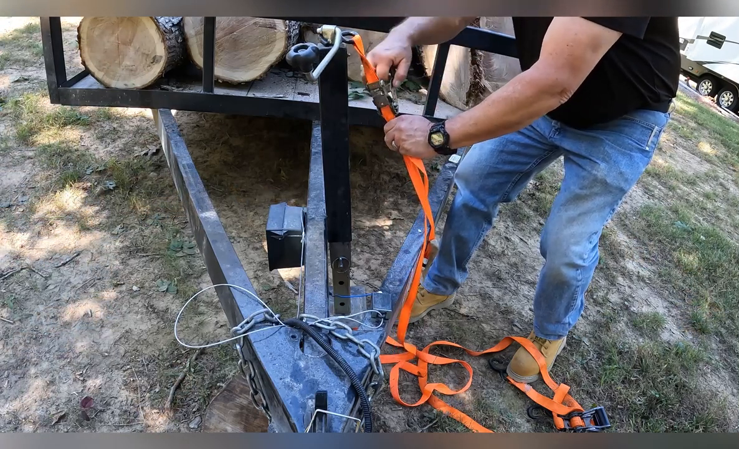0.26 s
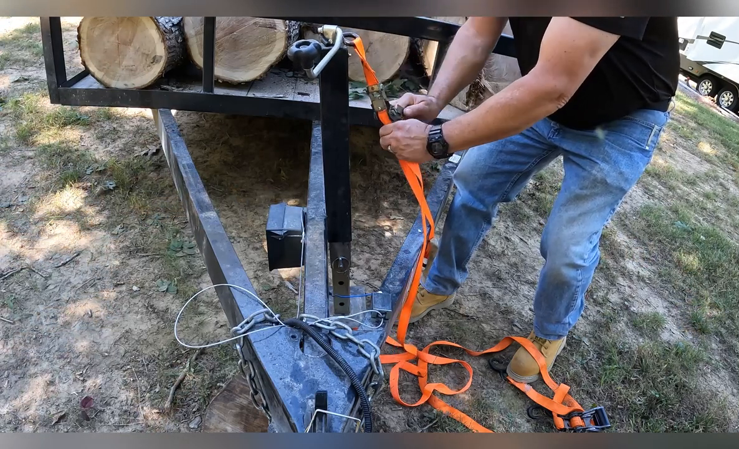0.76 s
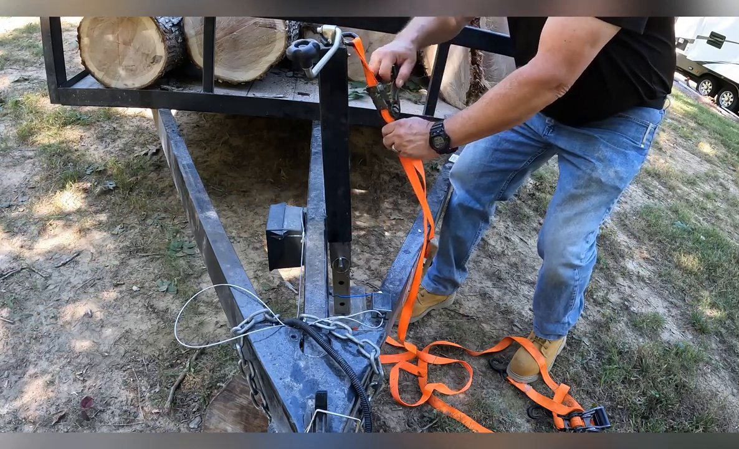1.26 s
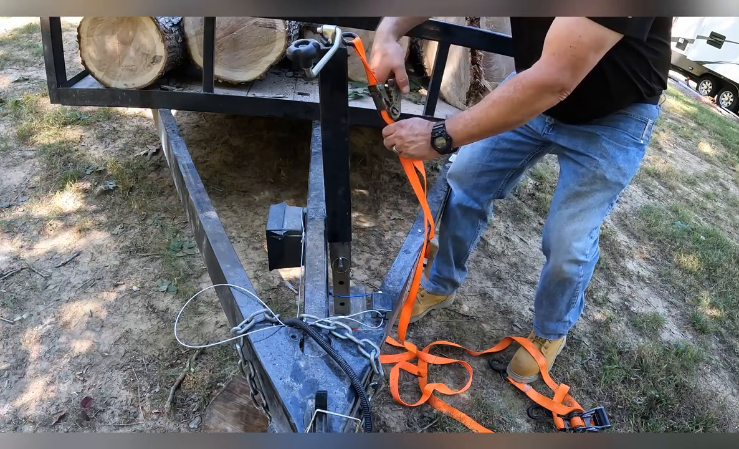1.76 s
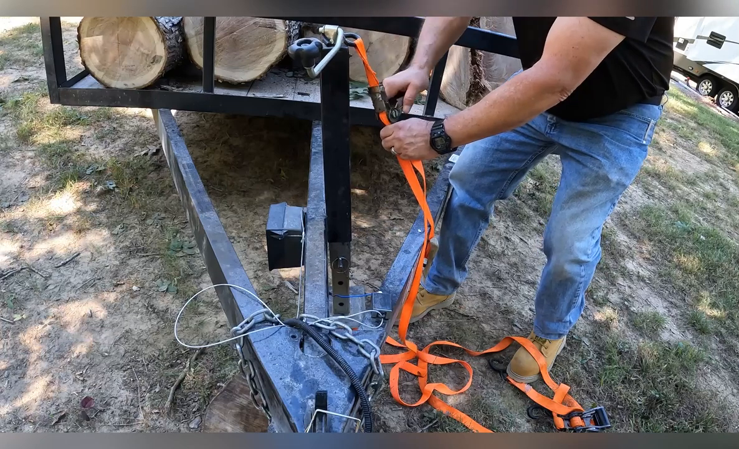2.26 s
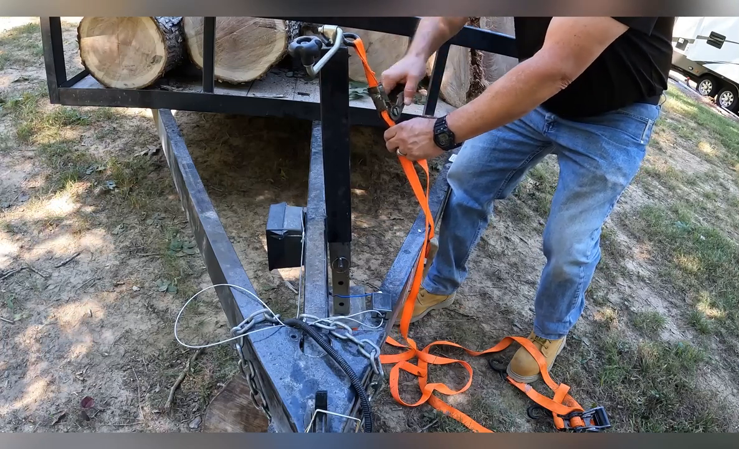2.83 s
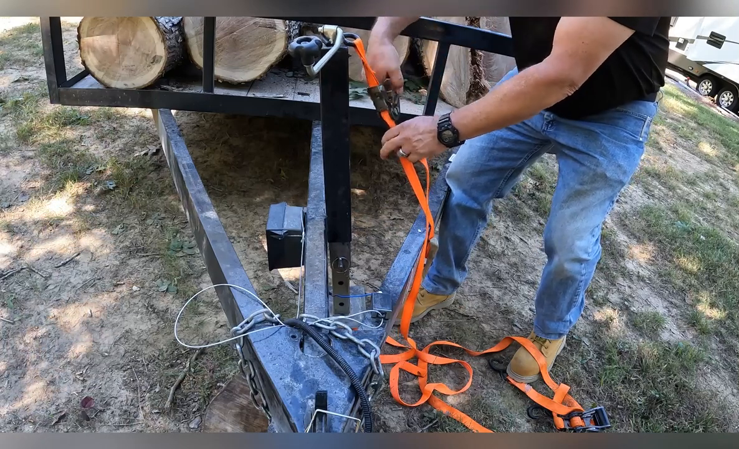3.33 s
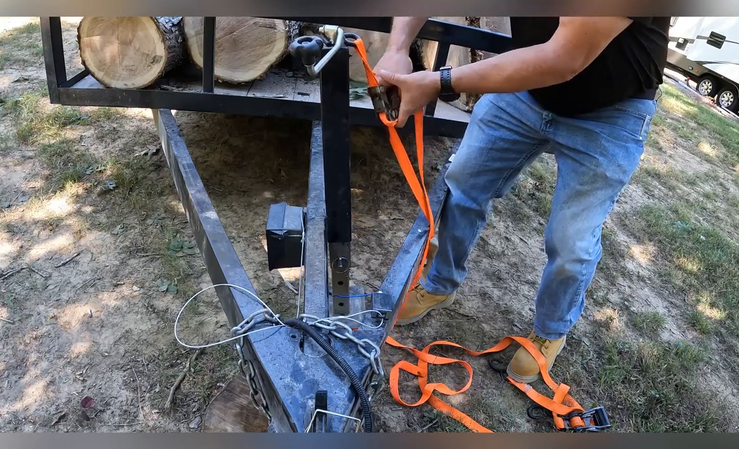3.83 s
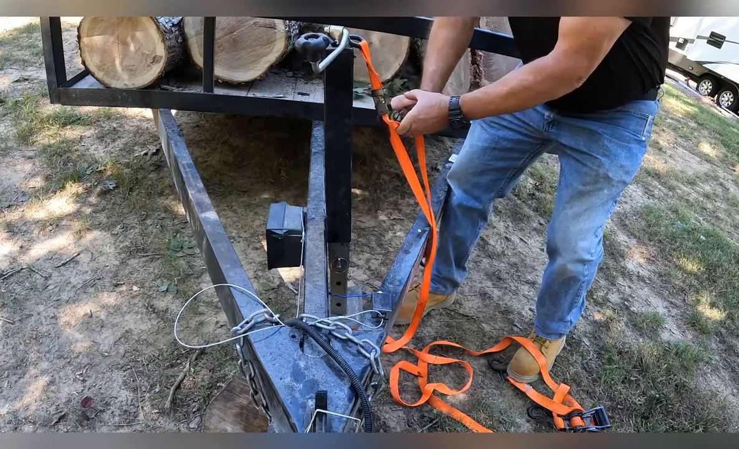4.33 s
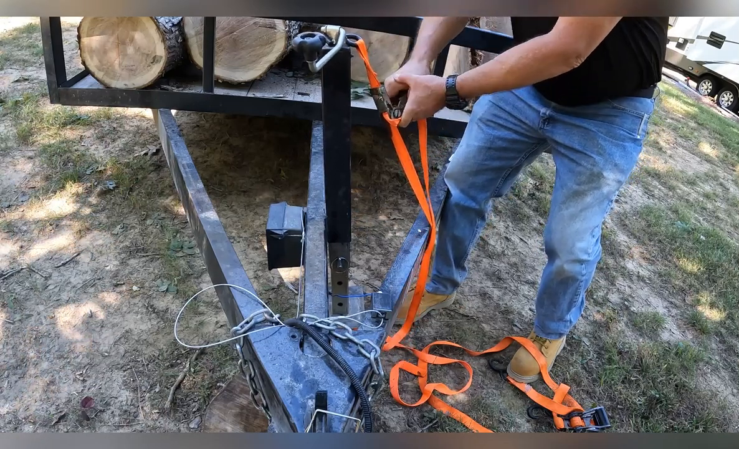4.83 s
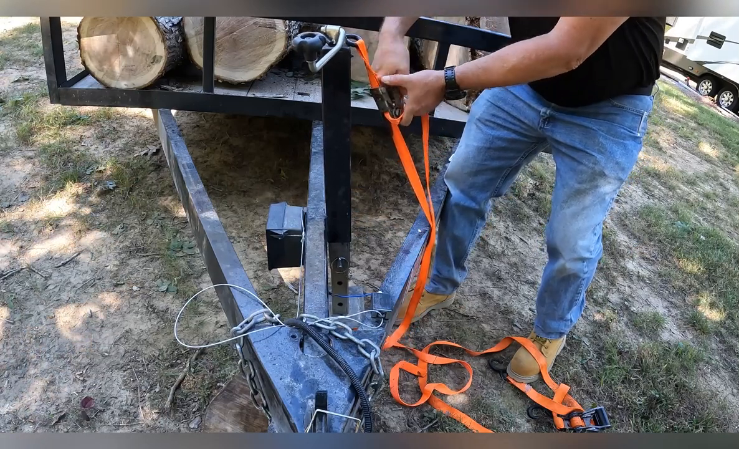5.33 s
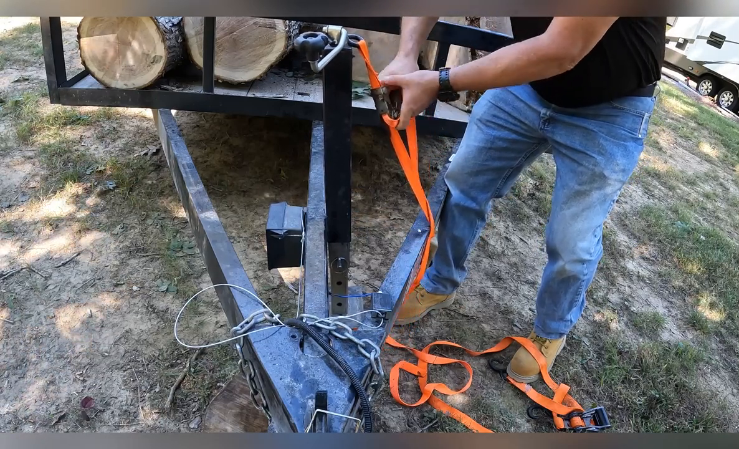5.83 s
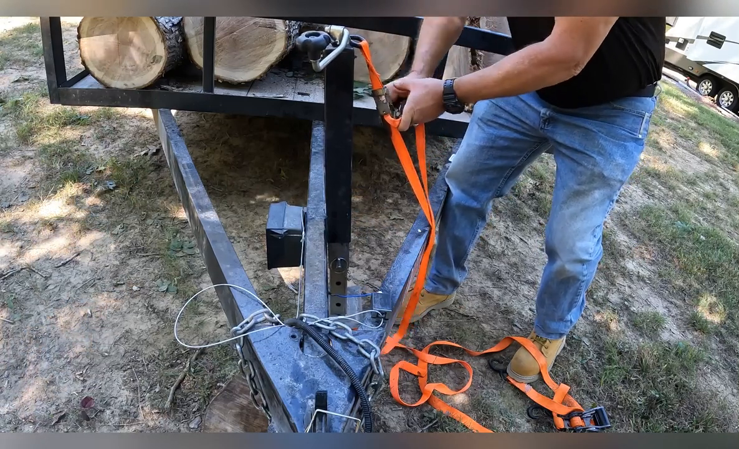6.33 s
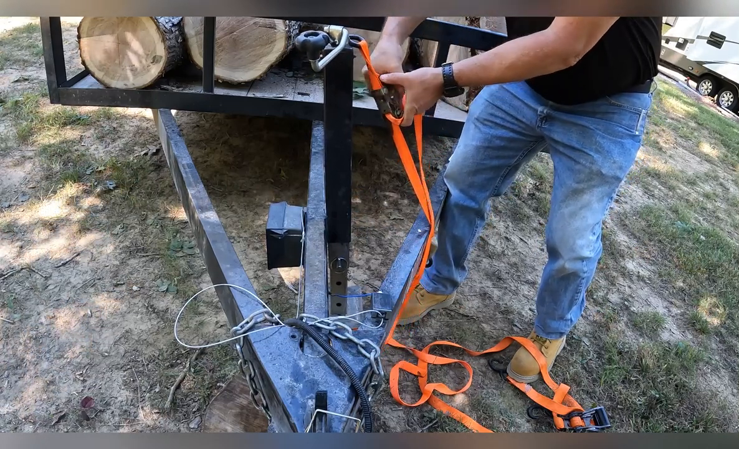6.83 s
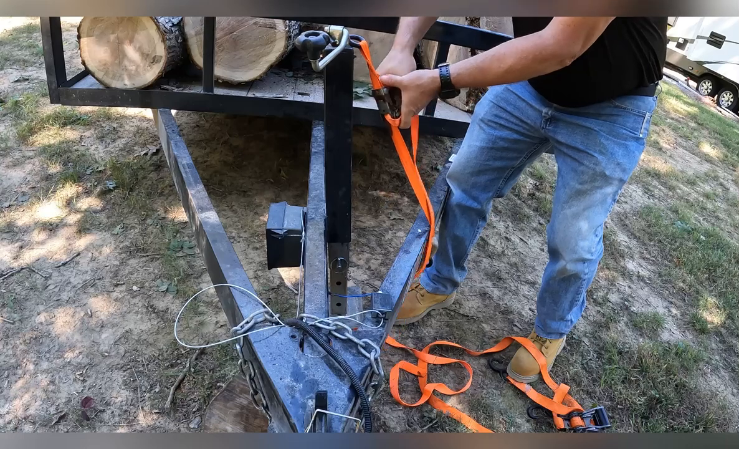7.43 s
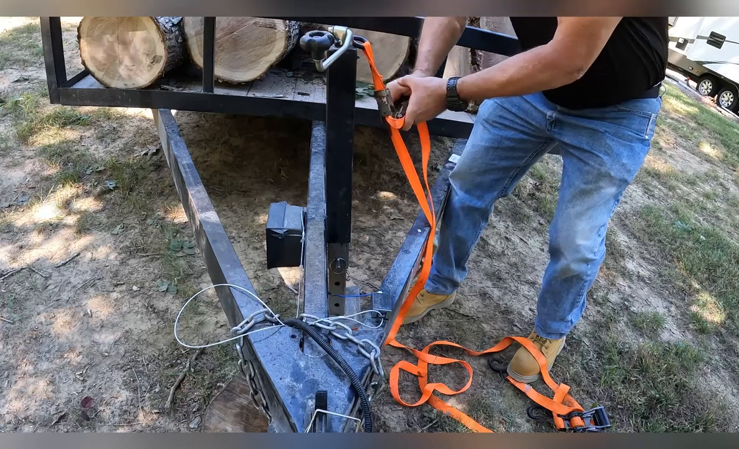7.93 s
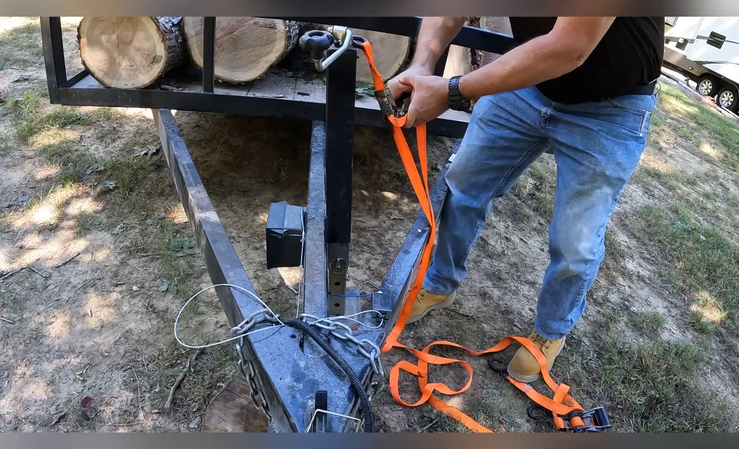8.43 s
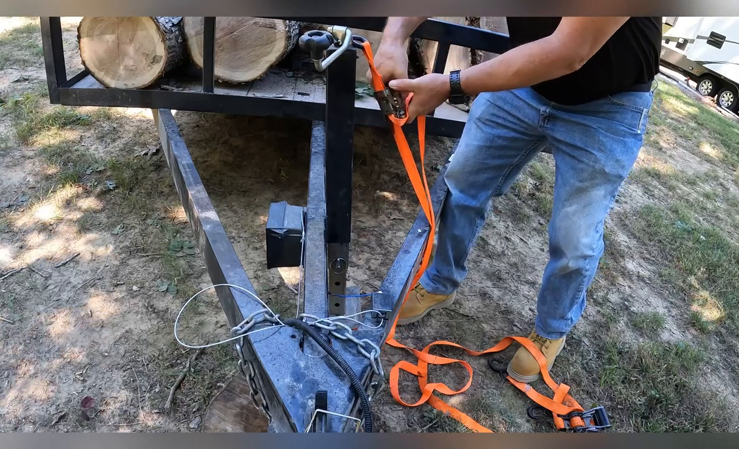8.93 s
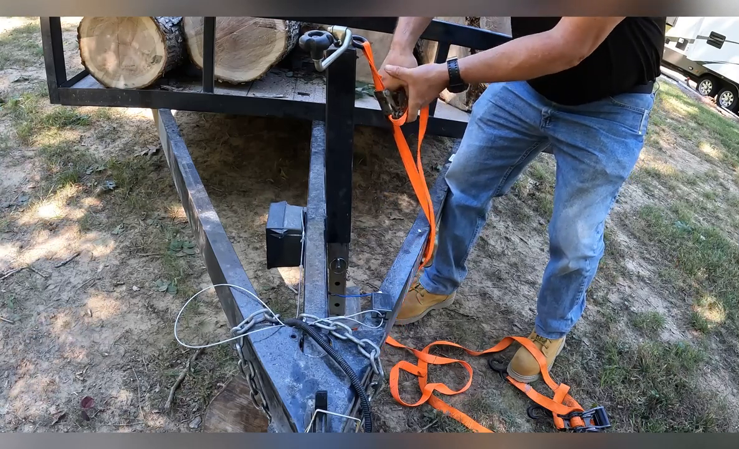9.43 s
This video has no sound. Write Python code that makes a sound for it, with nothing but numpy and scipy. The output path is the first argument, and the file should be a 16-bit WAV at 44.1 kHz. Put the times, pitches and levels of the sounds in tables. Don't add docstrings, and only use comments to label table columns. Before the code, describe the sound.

Sharp metallic pawl clicks crack one or two at a time as a strap tightens, ringing the trailer steel over faint hum and buffeting wind.

```python
import sys
import numpy as np
from scipy import signal
from scipy.fft import rfft, irfft
from scipy.io import wavfile
from scipy.ndimage import uniform_filter1d

SR = 44100
rng = np.random.default_rng(int(sys.argv[2]) if len(sys.argv) > 2 else 0)


def file_out(sig):
    cols = np.atleast_2d(sig).T
    lim = np.clip(cols, -1, 1)
    pcm = np.round(lim * 32767).astype(np.int16)
    wavfile.write(sys.argv[1], SR, pcm)


def volts_from_decibels(level):
    exponent = np.asarray(level, float) / 20
    return 10 ** exponent


N = 426888
HARD_DB = -13


def level(x, db):
    return x * volts_from_decibels(db) / np.sqrt(np.mean(x ** 2, axis=-1, keepdims=True))


def peak_one(x):
    return x / np.sqrt(uniform_filter1d(x ** 2, size=44).max(axis=-1, keepdims=True))


def fade(t, t60):
    return np.exp(-np.log(1000) * t / t60)


def sine(hz, t):
    return np.sin(2 * np.pi * hz * t)


def read(table, hz):
    table = np.array(table)
    return np.interp(np.log(np.maximum(hz, 1)), np.log(table[:, 0]), table[:, 1])


def curves(table):
    s, *columns = np.transpose(table)
    return [np.interp(np.arange(N) / SR, s, c) for c in columns]


def band(x, low_hz, high_hz, order=2):
    sos = signal.butter(order, [low_hz, min(high_hz, .45 * SR)], "band", fs=SR, output="sos")
    return signal.sosfilt(sos, x)


def walk(rate):
    k = int(SR / rate)
    steps = np.repeat(rng.standard_normal(N // k + 1), k)
    return 1.446 * uniform_filter1d(uniform_filter1d(steps, k), k)[:N]


def place(times, sounds):
    out = np.zeros((2, N + 2 * sounds.shape[-1]))
    for s, sound in zip(times, sounds):
        at = max(int(s * SR), 0)
        out[:, at:at + sound.shape[-1]] += sound
    return out[:, :N]


def resonance(hz, centre_hz, width_hz):
    return 1 / (1 + 2j * (hz - centre_hz) / width_hz)


def resonances(modes, hz, count, scatter_db, detune):
    chance = rng.standard_normal((count, len(modes), 2))
    response = 0
    for k, (mode_hz, width_hz, db) in enumerate(modes):
        strength = volts_from_decibels(db + scatter_db * chance[:, k, :1])
        response = response + strength * resonance(hz, mode_hz * (1 + detune * chance[:, k, 1:]), width_hz)
    return response


def contacts():
    # start in seconds, level in dB, t60 in seconds, most excited resonance in Hz, ringing one in Hz.
    snaps = [(0.0841, -10, 0.041, 4100, 3600), (0.1646, -13, 0.031, 5500, 5160),
             (0.4906, -12.5, 0.031, 6570, 6200), (0.4945, -16, 0.025, 11150, 6300),
             (0.7735, -15, 0.009, 5300, 5400), (0.7819, -14, 0.023, 7450, 4040),
             (1.2212, -9.5, 0.027, 3180, 4670), (1.307, -9.5, 0.029, 7700, 6740),
             (2.2379, -12, 0.011, 4800, 4740), (2.2438, -10, 0.027, 3540, 3450),
             (3.1324, -29, 0.011, 4600, 4650), (3.138, -10, 0.029, 3800, 5840),
             (4.102, -14.5, 0.027, 4850, 4700), (4.105, -15.5, 0.023, 7500, 6650),
             (4.11, -19.5, 0.052, 5050, 4850), (4.113, -13.5, 0.031, 2300, 4380),
             (5.1625, -9, 0.03, 7200, 4560), (6.0077, -12, 0.049, 4520, 4700),
             (6.018, -20, 0.01, 4720, 4440), (6.0234, -13.5, .018, 6200, 2250),
             (6.8156, -10.5, 0.022, 2820, 4000), (6.8255, -31, 0.0082, 3750, 6400),
             (8.0034, -19.5, 0.015, 4650, 3130), (8.007, -16, 0.012, 7100, 4670),
             (8.02, -20, 0.015, 4860, 4800), (8.025, -14.5, 0.028, 6800, 6260),
             (8.0281, -14, 0.011, 4630, 2380), (8.0312, -23, 0.025, 6400, 4670),
             (8.8669, -10.5, 0.025, 3570, 4340)]
    # start in seconds, level in dB, treble minus presence in dB, most excited resonance in Hz.
    ticks = [(0.3237, -32.5, -5, 4560), (0.614, -42.5, -19, 2800), (0.697, -44.5, -3, 4800),
             (1.1048, -40, -10, 4620), (2.552, -46, -9, 2000), (2.7223, -28, -12.5, 5430),
             (2.8257, -38.5, -11, 4660), (3.044, -51, 1, 5430), (4.621, -26, -2, 4770),
             (4.681, -34, -7, 4450), (4.999, -35, -16, 2600), (5.022, -41.5, -18, 7800),
             (5.047, -41.5, -27, 3270), (5.625, -43, -12, 3100), (5.808, -45.5, -8, 5500),
             (6.373, -44.5, -14, 5970), (6.396, -39.5, -11, 4440), (6.6876, -40, -18, 3770),
             (6.993, -33, 1, 3000), (7.374, -33, -17, 1120), (7.4591, -36.5, -20, 2550),
             (7.546, -50, -13, 2390), (7.569, -46, -4, 2890), (7.922, -52, -2, 3000),
             (7.9342, -30, -10, 4730), (8.313, -36, 1, 6850), (8.3165, -31, -13, 4670),
             (8.389, -29.5, -17, 3340), (9.0036, -41, -12, 3820), (9.0255, -33.5, 0, 3800),
             (9.028, -30.5, 1, 3900), (2.753, -51, -2, 6500), (2.788, -61, 8, 9800), (2.7948, -53, 3, 4700),
             (2.9185, -53, -15, 3900), (2.944, -57, 12, 10500), (2.987, -51, 2, 4800),
             (4.626, -33, -12, 2320), (4.81, -44, -12, 4400), (6.332, -49, -8, 2800),
             (9.01, -43, -15, 2480)]
    # start in seconds, level in dB, treble minus presence in dB, most excited resonance in Hz.
    skips = [(0.081, -26.5, -2, 3620), (0.162, -38, -24, 3000), (.281, -38.5, -11, 4370),
             (0.284, -45, -8, 5750), (0.29, -37.5, -8, 4160), (1.2127, -36, -6.5, 2200),
             (1.393, -40, -5, 4680), (1.401, -37, -7, 4650), (1.425, -35.5, -9, 5400),
             (2.9552, -39.5, -17, 3120), (2.956, -55, -19, 2920), (3.197, -35.5, -17, 2930),
             (3.209, -42.5, -9, 3210), (4.356, -42, -11, 4830), (4.357, -41.5, -20, 5400),
             (4.803, -47, -5, 4340), (5.156, -35.5, -17, 4500), (5.3272, -33, -14, 3770),
             (5.331, -42, -13, 4820), (5.338, -34.5, -21, 3020), (6.808, -33, -13, 6870),
             (6.955, -43.5, -12, 2300), (6.961, -46.5, -3, 3980), (6.967, -43, -8, 3500),
             (6.975, -44, -10, 6800), (6.9848, -39, -18, 3230), (6.989, -57, -15, 3700),
             (7.0047, -37, -12, 5800), (7.0073, -38, -21, 3090), (8.2983, -51, -12, 1980),
             (8.3998, -27.5, -23, 2300), (6.204, -54, -27, 5250), (6.211, -40, -43, 3500),
             (8.196, -45, -18, 3240), (8.2, -38, -30, 3000), (8.393, -38, -13, 5500),
             (8.408, -34, -14, 3000)]
    # start in seconds, level in dB.
    climbs = [
        (0.053, -35),
        (0.4698, -37.5),
        (2.2144, -44),
        (4.072, -43.5),
        (5.133, -41.5),
        (5.973, -37),
        (6.7757, -45),
    ]
    # start in seconds, level in dB.
    bumps = [(0.7975, -35), (2.2523, -37), (2.279, -46), (3.148, -38), (6.827, -34), (8.876, -36),
             (8.418, -37), (5.1873, -39), (5.766, -44.5), (6.1995, -33.5), (6.653, -52), (7.006, -42),
             (8.0573, -53), (8.1874, -29), (8.208, -45), (8.355, -45), (8.4023, -33)]
    rows = []
    for s, db, t60, hz, ring_hz in snaps:
        treble_db = 3.5 + 0.86 * (db - HARD_DB)
        rows.append((s, db, treble_db, t60, hz, ring_hz))
    rows += [(s, db, treble_db, 0.03, hz, hz) for s, db, treble_db, hz in ticks]
    rows += [(s, db, treble_db, 0.05, hz, hz) for s, db, treble_db, hz in skips]
    rows += [(s, db, -12.5, 0.059, 3500, 3500) for s, db in climbs]
    rows += [(s, db, -35, 0.073, 2510, 2510) for s, db in bumps]
    return rows


def ratchet(size=5120):
    # pitch in Hz, width in Hz, level in dB.
    pawl = [(1410, 130, -1.5), (2300, 78, 8.5), (3250, 890, 0), (4670, 2250, 5.5), (6200, 1173, -0.5),
            (6740, 300, -8.5), (11600, 2500, -10)]
    # pitch in Hz, width in Hz, level in dB.
    handle = [(2020, 130, -9), (2340, 150, -7), (3700, 130, -9), (4250, 150, -5), (4740, 130, -3),
              (6400, 200, -7), (7270, 220, -12)]
    # time in seconds, ring level in dB.
    tension = [
        (0, -11.5),
        (3.5, -5),
        (4.1, -1),
        (5.2, -6),
        (6, 1),
        (6.9, 3),
        (8, 0.5),
        (9.68, 4.5),
    ]
    # frequency in Hz, left minus right in dB.
    port_balance = [(700, -1.5), (4400, -1.5), (8100, -1.5), (15000, 3.5)]
    # frequency in Hz, radians by which left leads.
    port_phase = [(300, 0.34), (3400, -0.74), (5400, -0.62), (11000, -0.33), (13000, 0.97)]

    s, db, treble_db, t60, struck_hz, ring_hz = np.array(contacts()).T[:, :, None]
    t, hz = np.arange(size) / SR, np.fft.rfftfreq(size, 1 / SR)
    noise = rng.standard_normal((len(s), 5, size))
    softness_db = db - HARD_DB
    lead_s = .004
    after = np.maximum(t - lead_s, 0)

    grit = noise[:, 0] * volts_from_decibels(5.0 * noise[:, 1])
    lumps = volts_from_decibels(3.5 * np.sqrt(150) * uniform_filter1d(noise[:, 1], size=150))
    slip = volts_from_decibels(-35) * np.exp(np.minimum(t - lead_s, 0) / 0.0012) * (t < lead_s)
    touch_s = 0.00024 * volts_from_decibels(-.3 * (db + 6.5))
    onset = 1 - np.exp(-after / touch_s)
    strike = volts_from_decibels(3 + 0.17 * softness_db) * fade(after, .005) * (t60 < .043)
    crack = grit * (slip + onset * (fade(after, np.clip(t60, .004, .2)) + strike))

    tilt = volts_from_decibels(treble_db * np.clip(np.log2(hz / 2600 + 1e-9) / 2.83, -.4, 1.1))
    top_hz = np.where(s < 4, 12800, 11500)
    edges = hz ** 3 / (hz ** 3 + 1050 ** 3) / np.sqrt(1 + (hz / top_hz) ** 14)
    struck = 1 + volts_from_decibels(7.5) * resonance(hz, struck_hz, 0.07 * struck_hz)
    capsule = 1 + volts_from_decibels(11) * resonance(hz, 10150, 480)
    colour = resonances(pawl, hz, count=len(s), scatter_db=1.0, detune=0.036) * tilt * edges * capsule
    crack = peak_one(irfft(rfft(crack) * colour * struck))

    plates = resonances(handle, hz, count=len(s), scatter_db=3.0, detune=.015)
    plates = plates * np.sqrt(tilt) / (1 + (hz / 7000) ** 4)
    plates = plates + volts_from_decibels(2.5 + .4 * softness_db) * resonance(hz, ring_hz, 200)
    rattle = noise[:, 2] * (t > lead_s) * lumps * fade(after, .15)
    ring = peak_one(irfft(rfft(rattle) * plates))
    ring_db = -18.5 + .15 * softness_db + np.interp(s, *np.transpose(tension))

    skew = volts_from_decibels(read(port_balance, hz) / 2) * np.exp(.5j * read(port_phase, hz))
    near = rfft(crack + ring * volts_from_decibels(ring_db))
    near = irfft(near[:, None] * np.array([skew, 1 / skew]))

    swell = (1 - np.exp(-after / 0.00115)) * (fade(after, .032) + volts_from_decibels(-24.0) * lumps * fade(after, 0.24))
    far_colour = colour / (1 + (hz / 7500) ** 3)
    scatter = level(irfft(rfft(noise[:, 3:]) * far_colour[:, None]), -13.5) * swell[:, None]
    scatter = scatter + 0.38 * scatter[:, ::-1]
    return place(s[:, 0] - lead_s, (near + scatter) * volts_from_decibels(db - 3.5)[:, None])


def trailer(size=12288):
    # start in seconds, level in dB, pitch of the main beam ring in Hz (a
    # slightly lower partner beats with it), clatter relative in dB.
    knocks = [(0.081, -50, 410, 13), (0.164, -40, 487, 3.5), (0.287, -46, 456, 1), (0.492, -35.5, 400, 3.5),
              (0.78, -30.5, 430, -1), (.81, -32, 307, -21), (1.094, -36, 325, -20),
              (1.339, -31.5, 310, -21), (1.22, -40, 430, 1), (1.308, -40.5, 488, 3), (2.24, -35, 453, 7.5),
              (2.84, -37, 430, -16), (3.193, -41.5, 411, 2.5), (4.115, -24, 443, -0.5),
              (5.162, -23.5, 450, 2.5), (5.334, -32.5, 433, -6.5), (6.025, -26.5, 464, 3),
              (6.2, -35.5, 495, 2.5), (6.819, -30, 441, -1.5), (7.008, -34, 464, -12),
              (7.376, -56.5, 440, 15.5), (7.934, -47, 393, 0), (8.03, -27, 503, 5), (8.155, -37, 543, -25),
              (8.186, -34, 542, -3), (8.18, -37, 580, -24), (8.29, -40, 583, -20), (5.0, -40.5, 453, -12),
              (8.39, -22.5, 457, -11), (8.411, -29.5, 577, -25), (8.424, -31, 310, -18),
              (8.45, -32.5, 493, -20), (8.868, -32.5, 489, 2.5), (9.032, -31.5, 468, -3)]
    # pitch in Hz, width in Hz, level in dB.
    frame = [(310, 32, -16), (502, 60, -7.5), (614, 56, -3), (800, 120, -9.5), (1013, 81, -1),
             (1044, 190, 1.5), (1236, 120, 3), (1384, 44, -4.5), (1736, 240, -6.5), (2200, 284, -11.5),
             (2740, 390, -34)]
    # pitch in Hz, level in dB, t60 in seconds.
    hook_modes = [(430, -49, 0.33), (623, -43, 0.21), (807, -53.5, 0.27), (1450, -65, 0.64),
                  (1730, -52, 0.38), (1960, -65, 0.31), (2890, -58, .2), (3740, -59.5, 0.38)]
    # start in seconds, level in dB, clank pitch in Hz, clank level in dB.
    hook_blows = [(5.165, -32, 963, -47), (5.334, -25, 800, -54.5), (6.03, -32, 1020, -54),
                  (6.21, -24, 1510, -60), (6.82, -36, 1244, -43), (7.009, -30, 1194, -52.5),
                  (8.03, -30, 970, -53), (8.215, -20, 1450, -55), (8.26, -40, 1450, -60),
                  (8.402, -9.5, 2290, -52), (8.866, -32.5, 1274, -40.5), (8.872, -34, 956, -48),
                  (9.03, -24, 1443, -48.5)]

    s, db, low_hz, clatter_db = np.array(knocks).T[:, :, None]
    t, hz = np.arange(size) / SR, np.fft.rfftfreq(size, 1 / SR)
    noise = rng.standard_normal((len(s), 4, size))
    beam = sine(low_hz, t) * fade(t, .19)
    beam = beam + .7 * sine(.925 * low_hz, t) * fade(t, .22)
    beam = beam + .3 * sine(1.27 * low_hz, t) * fade(t, .08)
    push = noise[:, 0] * t * np.exp(-t / 0.011)
    beam = peak_one(signal.fftconvolve(push, beam, axes=-1)[:, :size])

    shake = noise[:, 1:2] + 0.7 * noise[:, 2:]
    shake = shake * (1 - np.exp(-t / 0.0042)) * (fade(t, 0.11) + volts_from_decibels(-18.0) * fade(t, 0.61))
    steel = resonances(frame, hz, count=len(s), scatter_db=2.5, detune=0.049)
    clatter = peak_one(irfft(rfft(shake) * steel[:, None]))
    knock = (beam[:, None] + clatter * volts_from_decibels(clatter_db)[:, None]) * volts_from_decibels(db - 9.5)[:, None]

    ring = sum(volts_from_decibels(mode_db) * sine(mode_hz, t) * fade(t, t60) for mode_hz, mode_db, t60 in hook_modes)
    ring = ring * (1 - np.exp(-t / 0.013))
    blow_s, blow_db, clank_hz, clank_db = np.array(hook_blows).T[:, :, None]
    clank = volts_from_decibels(clank_db + 8.5) * sine(clank_hz, t) * fade(t, 0.13) * (1 - np.exp(-t / 0.0019))
    blow = volts_from_decibels(blow_db + 19.0) * ring + clank
    hook = place(blow_s[:, 0], np.repeat(blow[:, None], 2, axis=1))
    return (place(s[:, 0], knock) + hook) * volts_from_decibels(np.array([[-.7], [.7]]))


def wind(size=6144):
    # time in seconds, rumble in dB.
    gust = [(0, -42), (.7, -45), (1.32, -42.5), (1.59, -32.5), (1.83, -25.5), (1.99, -45), (2.86, -36),
            (3.15, -43), (3.64, -47.5), (4.72, -50.5), (5.12, -45), (6.76, -45), (7.28, -39), (7.63, -38),
            (7.84, -33), (8.65, -33), (9.63, -34), (9.68, -40)]
    # centre in seconds, peak in dB, pitch in Hz, sharp front relative in dB.
    buffets = [(0.184, -17, 59.6, -38), (0.4, -21, 33.5, -35), (1.285, -18.5, 65, -28),
               (1.415, -12, 60, -36), (1.679, -11.5, 44.8, -30), (1.699, -14, 48, -30),
               (1.717, -10.5, 84, -15.5), (1.765, -5.5, 60, -19), (1.765, -26, 490, -29),
               (1.808, -12.5, 67.5, -11.5), (1.818, -17.5, 60, -15), (2.236, -17, 53, -32),
               (2.485, -8.5, 99, -24), (2.765, -19, 62, -41), (6.933, -23, 85.6, -32.5),
               (7.932, -17, 72.4, -26.5), (7.976, -9.5, 82.4, -14), (8.24, -17, 122, -20),
               (8.281, -14.5, 60.5, -31), (8.378, -16, 49.8, -25), (8.51, -11.5, 60, -16),
               (8.539, -10.5, 75, -8), (8.688, -11.5, 129, -6), (8.712, -11, 133, -23),
               (8.769, -15.5, 87, -8), (8.822, -15.5, 66.5, -39), (8.885, -15, 85.5, -34),
               (9.069, -14, 104, -7.5), (9.14, -12, 128, -12.5), (1.525, -19, 45, -25),
               (1.931, -15, 42, -30), (1.989, -22, 50.1, -29), (8.254, -21.5, 110, -20),
               (8.565, -16.5, 90, -8), (8.989, -19, 60, -16.5), (9.054, -14, 95, -21),
               (9.121, -21, 140, -0.5), (9.221, -20.5, 120, -13), (9.292, -27.5, 104, -22),
               (9.64, -36, 110.6, -16), (9.499, -20, 120, -12), (9.546, -23, 110, -22),
               (9.109, -27, 150, -14)]
    # centre in seconds, peak in dB, pitch in Hz, sharp front relative in dB.
    puffs = [
        (1.433, -11, 70, -25),
        (1.476, -7, 84, -16.5),
        (1.4762, -34, 400, -30),
        (1.892, -8, 89, -13.5),
        (1.8932, -40, 396, -29),
        (1.7185, -35, 420, -30),
        (9.198, -13.5, 80, -18),
        (9.363, -13.5, 98, -18),
        (9.484, -16.5, 79.4, -17),
    ]

    rumble_db = curves(gust)[0]
    noise = rng.standard_normal((2, 3, N))
    rumble = level(band(noise[0, 0] + .3 * noise[0, 1:], 12, 55), 0)
    rumble = rumble * volts_from_decibels(rumble_db - 1 + 2.5 * walk(14))
    flutter = level(band(noise[1, 0] + 0.55 * noise[1, 1:], 110, 240, order=3), -54)
    flutter = flutter * volts_from_decibels(1.2 * (rumble_db + 35.5) + 2.0 * walk(25))

    s, db, hz, edge_db = np.array(buffets + puffs).T[:, :, None, None]
    t = (np.arange(size) - size // 2) / SR
    chance = rng.standard_normal((len(s), 3, 1))
    suction = (np.arange(len(s)) < len(buffets))[:, None, None]
    phase = np.pi * suction + .6 * chance[:, :1] + .4 * chance[:, 1:]
    swing = np.cos(2 * np.pi * hz * t + phase) * np.exp(-(t * hz / (0.36 + (hz / 750) ** 2)) ** 2)
    edge = np.cos(2 * np.pi * 200 * t + phase + .6 * chance[:, 1:]) * np.exp(-(t / .0027) ** 2)
    swirl = rng.standard_normal((len(s), 3, size))
    wake = level(band(swirl[:, :1] + .4 * swirl[:, 1:], 14, 90, order=4), -12) * np.exp(-(t / .03) ** 2)
    eddy = (swing + wake + edge * volts_from_decibels(edge_db + 2)) * volts_from_decibels(db - 5.0)
    eddies = place(s.ravel() - size // 2 / SR, eddy)
    return (rumble + flutter + eddies) * volts_from_decibels(np.array([[-2.6], [2.6]]))


def leaves():
    # time in seconds, level in dB.
    stir = [(0.0, -73), (0.1, -72.5), (1.08, -85), (1.27, -71.5), (1.45, -80.5), (1.8, -85.5), (4.2, -77),
            (4.39, -89.5), (5.04, -77), (5.18, -73), (5.42, -82), (5.88, -77.5), (6.61, -85), (6.85, -74),
            (7.28, -85), (8.03, -80.5), (8.44, -87), (8.95, -76), (9.68, -81)]
    sparse = rng.standard_normal((2, N)) * volts_from_decibels(8.2 * rng.exponential(size=N).clip(0, 4))
    sparse = sparse + 0.68 * sparse[::-1]
    bright = level(band(sparse, 9600, 11040), 0) + level(band(sparse, 5040, 18000, order=1), -0.5)
    return bright * volts_from_decibels(curves(stir)[0] - 1.5 + 4.9 * walk(29))


def insect():
    # time in seconds, wing strokes so far, level in dB.
    trill = [
        (0, -.12, -73),
        (2.5, 61.5, -72),
        (2.888, 71, -70),
        (4.05, 99, -69),
        (5, 122, -73),
        (6.5, 158.43, -71),
        (8, 194.76, -73),
        (9.68, 235.2, -70),
    ]
    strokes, db = curves(trill)
    part = (strokes + .5) % 1 - .5
    hz = 8450 - 11000 * part ** 2
    chirp = np.sin(2 * np.pi * np.cumsum(hz) / SR) * np.exp(-(part / .23) ** 2)
    return chirp * volts_from_decibels(db - .8 + 2.0 * walk(10))


def hums():
    # time in seconds, level of its lowest tone in dB.
    motor_level = [
        (0.0, -69),
        (0.59, -45),
        (1.64, -41.5),
        (4.23, -48),
        (9.17, -36.5),
        (9.68, -45),
    ]
    mains = sine(120, np.arange(N) / SR) * volts_from_decibels(-45.5 + 0.24 * walk(2.18))
    turn = 2 * np.pi * np.cumsum(155.2 + 1.267 * walk(3.6)) / SR
    motor = np.sin(turn)
    motor = motor + volts_from_decibels(-27 + 3.0 * walk(1.2)) * np.sin(2 * turn)
    motor = motor + volts_from_decibels(-28 + 3.0 * walk(1.2)) * np.sin(3 * turn)
    return np.sqrt(2) * (mains + motor * volts_from_decibels(curves(motor_level)[0] - 7.0))


def air():
    # frequency in Hz, level in dB.
    spectrum = [(120, -4.5), (190, -13.5), (330, -17), (466, -18), (720, -27.5), (1250, -19), (2200, -21.5),
                (4000, -24.5), (7500, -31.5), (8900, -43.5), (10200, -43), (11500, -48), (13800, -57),
                (15200, -78.5)]
    # frequency in Hz, left-right likeness from 0 to 1.
    likeness = [(200, 1), (640, 0.62), (1400, 0.43), (3100, 0.37), (6800, 0.53), (15000, 0.4)]
    # frequency in Hz, left minus right in dB.
    balance = [(300, 0), (700, 2), (1300, 2.5), (2400, 4), (4400, 1), (9000, 3)]
    # time in seconds, level in dB.
    rustle = [
        (0.0, -59),
        (0.08, -58),
        (2.26, -62),
        (2.99, -59.5),
        (9.08, -61),
        (9.68, -61),
    ]

    hz = np.fft.rfftfreq(N, 1 / SR)
    mid, side = rfft(rng.standard_normal((2, N))) * volts_from_decibels(read(spectrum, hz))
    like = np.clip(read(likeness, hz), 0, .99)
    pan = volts_from_decibels(read(balance, hz) / 2)
    mid, side = mid * np.sqrt(1 + like), side * np.sqrt(1 - like)
    both = np.array([(mid + side) * pan, (mid - side) / pan])
    rustle_db = curves(rustle)[0]
    rustle_db = rustle_db - np.median(rustle_db) + .9 * walk(12)
    out = 0
    for k in range(8):
        octaves = np.log2(hz / (130 * 2 ** k) + 1e-9)
        share = np.cos(np.pi / 2 * np.clip(octaves, -1, 1)) ** 2
        swell_db = rustle_db * min(k / 5, 1.2) + .7 * walk(6)
        out = out + irfft(both * share, N) * volts_from_decibels(swell_db)
    return out * volts_from_decibels(-55) / np.std(out.mean(axis=0))


def scene():
    return ratchet() + trailer() + wind() + leaves() + insect() + hums() + air()


def roll_off(x):
    return signal.sosfilt(signal.butter(12, 16520, fs=SR, output="sos"), x)


def record(dry):
    soft = signal.sosfilt(signal.butter(6, 14300, fs=SR, output="sos"), dry)
    mix = signal.sosfilt(signal.ellip(8, .2, 60, 16380, fs=SR, output="sos"), soft)
    return roll_off(mix)


dry = scene()
out = record(dry)
file_out(out)
```